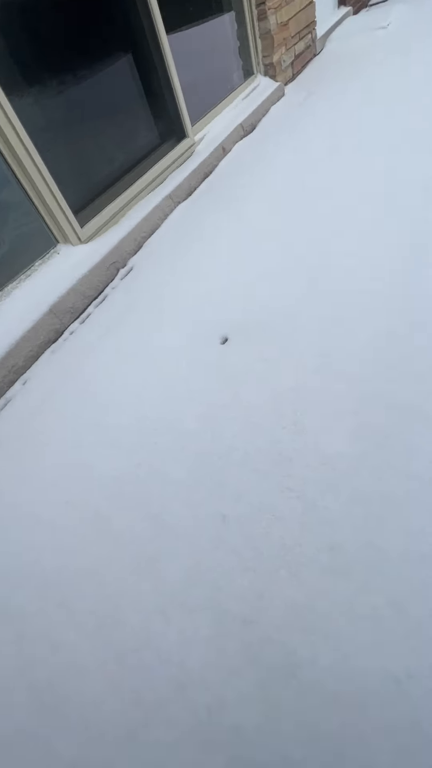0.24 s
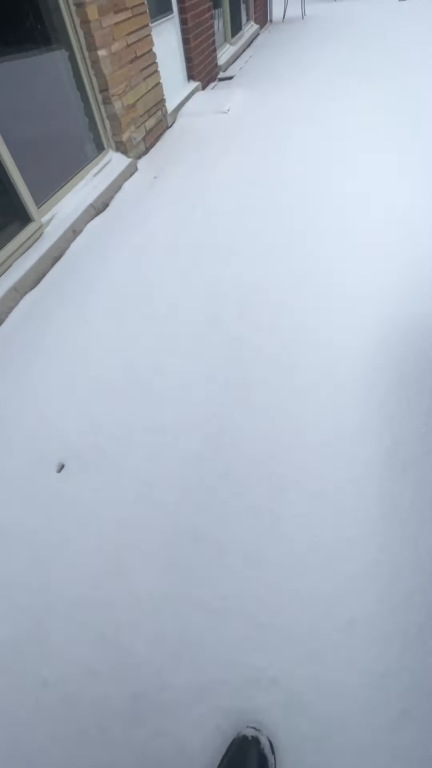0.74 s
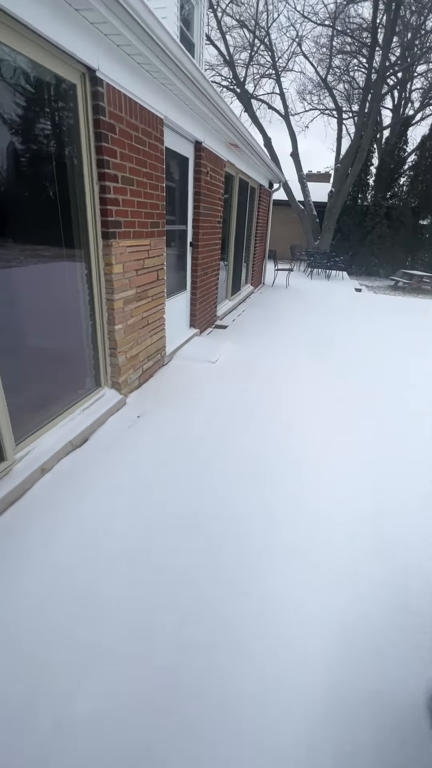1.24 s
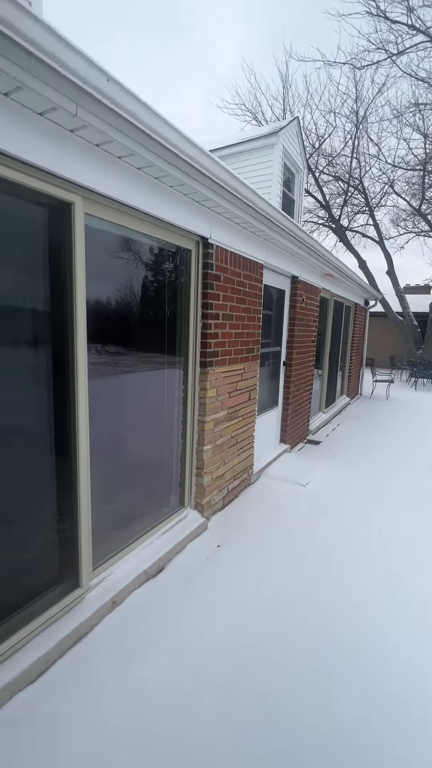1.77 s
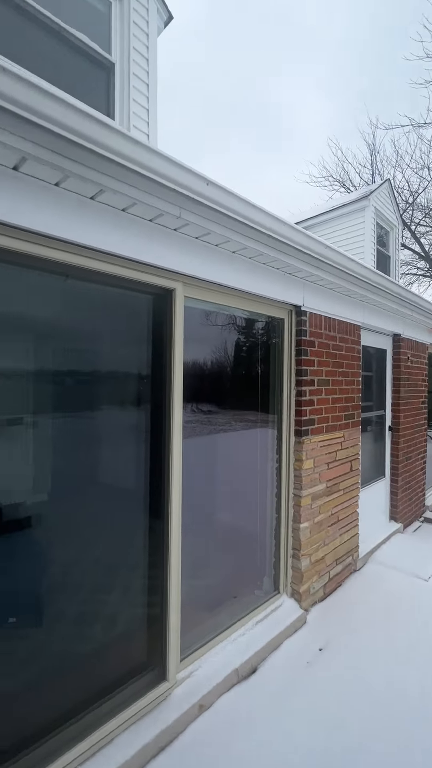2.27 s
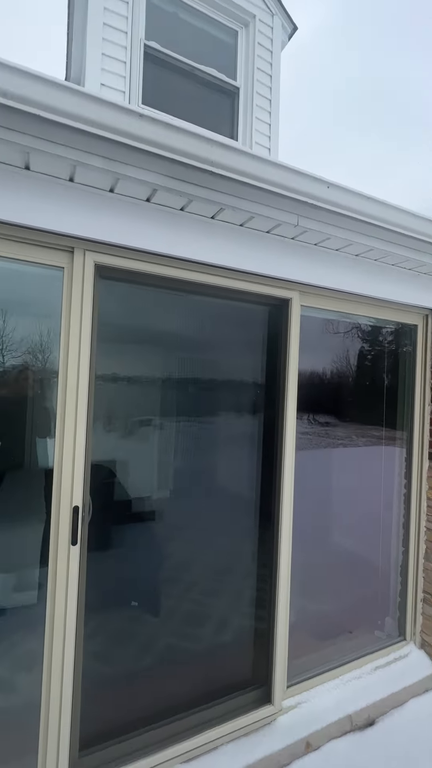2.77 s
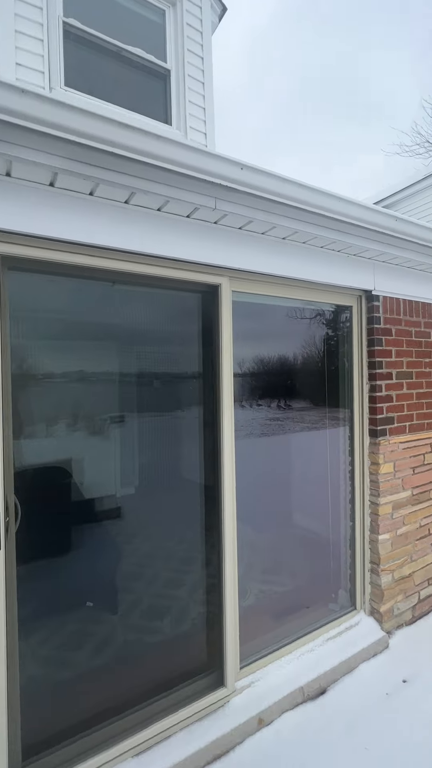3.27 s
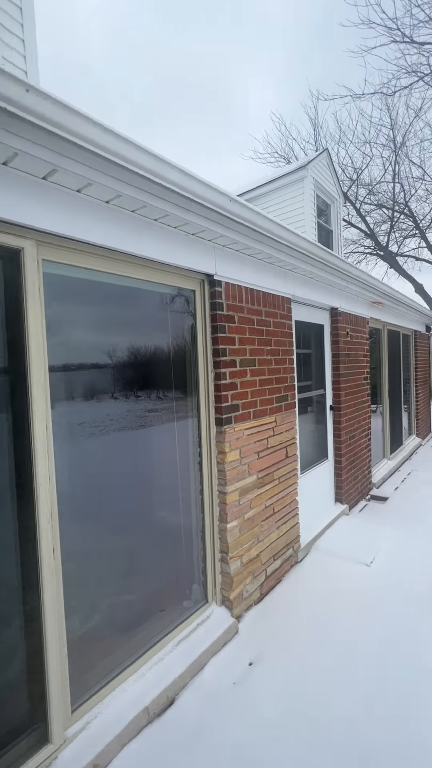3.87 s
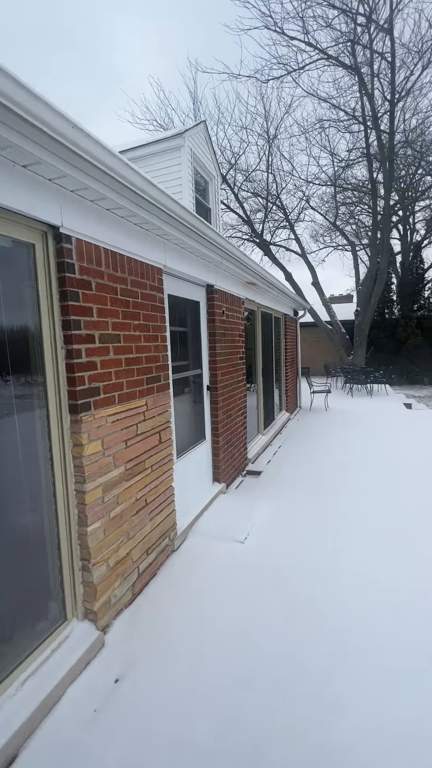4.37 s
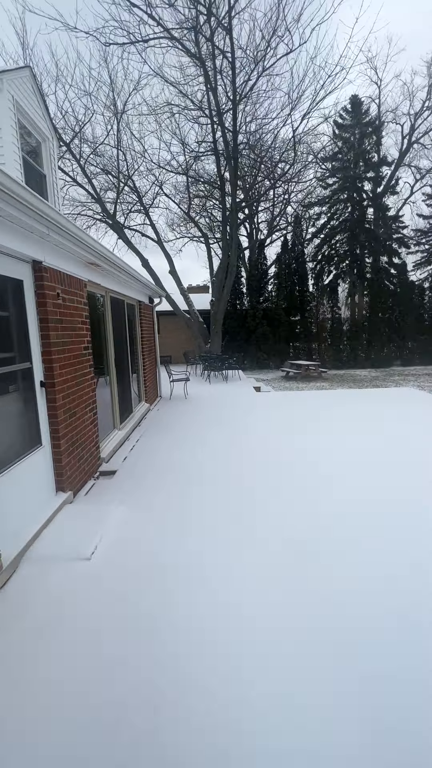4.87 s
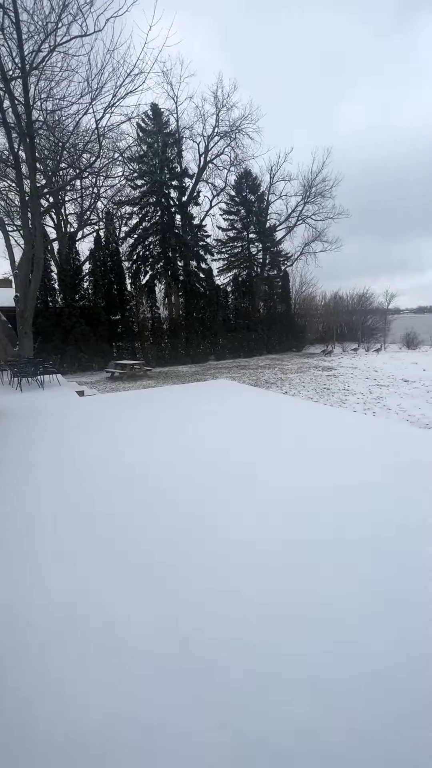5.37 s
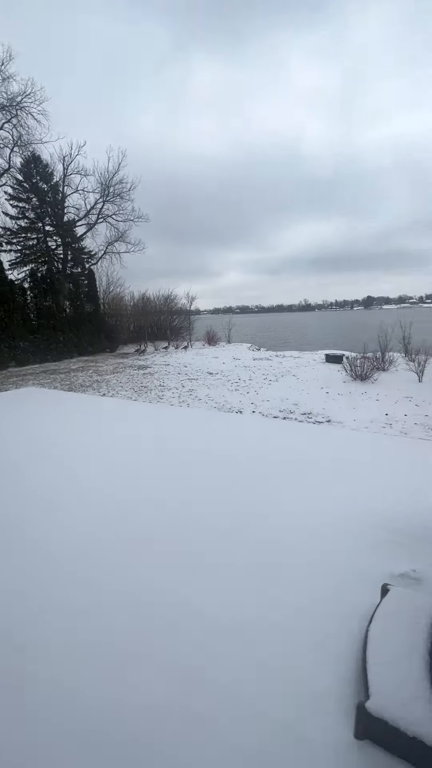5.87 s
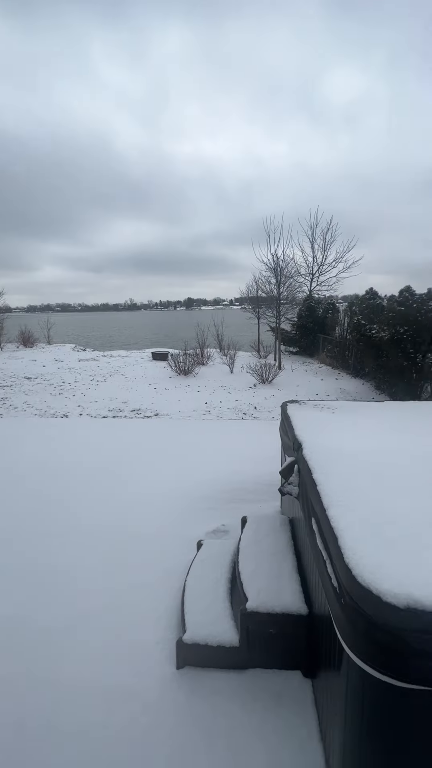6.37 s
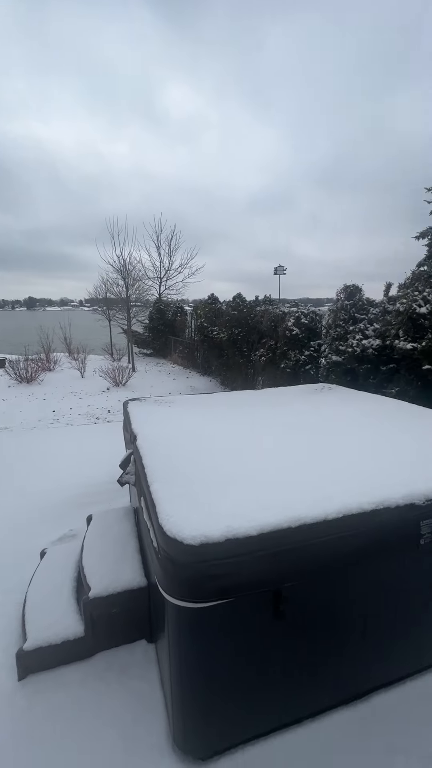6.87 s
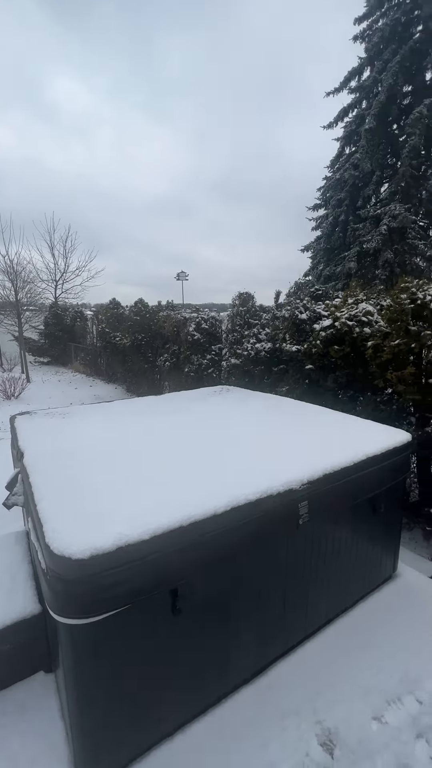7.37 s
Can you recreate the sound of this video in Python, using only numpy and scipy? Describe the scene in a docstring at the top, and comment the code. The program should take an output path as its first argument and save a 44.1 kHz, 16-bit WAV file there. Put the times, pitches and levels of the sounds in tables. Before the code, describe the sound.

Boots crunch through crusty snow on a terrace, close to a hand-held microphone. The first steps are loudest, with sharp crackles, gritty scuffs and dull heel thuds. The uneven steps then grow softer and dwindle to light shuffles near the end. Low wind rumbles on the microphone throughout, with a few puffs early on. Water birds and a small songbird call faintly far off, and a pump hums very quietly nearby.

```python
"""Boots crunch through crusty snow, close to a hand-held phone on a terrace beside a house.
The crust breaks in bursts of tiny cracks, loose crystals rasp under the moving sole, and heels thud
on the slab below. Wind rumbles on the two microphone ports and puffs on them as the phone swings.
A faint high whistle or creak follows one step. Far off, water birds and a small songbird call
faintly; nearby, a pump hums."""
import sys
import numpy as np
from scipy import signal
from scipy.fft import rfft, irfft, next_fast_len
from scipy.io import wavfile
from scipy.ndimage import uniform_filter1d, map_coordinates

SR = 44100
rng = np.random.default_rng(int(sys.argv[2]) if len(sys.argv) > 2 else 0)


def log_audio(samples):
    """Write samples as a 16-bit WAV file to the path given in sys.argv[1]."""
    # one column per channel
    frames = np.atleast_2d(samples).T
    # limit to full scale, then quantise
    limited = np.clip(frames, -1, 1)
    pcm = np.round(limited * 32767).astype(np.int16)
    wavfile.write(sys.argv[1], SR, pcm)


N = 336924

# the pump nearby: f/Hz, level/dB
PUMP_HUM = [(118.5, -59)]
# a faint high whistle or creak just after a step (first row), then distant bird calls:
# t/s, length/s, pitch/Hz, glide from start to end/Hz, level/dB
WHISTLES = [(1.02, .21, 3240, -27, -55.5), (2.993, 0.283, 988, 55, -62.5), (3.306, 0.047, 4250, -800, -56),
            (4.675, 0.037, 1470, -22, -62), (4.95, 0.104, 1232, -46, -67), (5.135, 0.056, 1475, 12.5, -66),
            (5.236, 0.036, 4690, 0, -59), (5.872, 0.0475, 3140, -520, -77.5),
            (5.947, 0.158, 1410, 108.5, -76), (6.116, 0.25, 1245, -5, -64.5),
            (6.143, 0.04, 4310, -700, -66), (6.25, 0.255, 4180, 50, -80), (6.17, 0.34, 540, 92.5, -54),
            (6.507, 0.073, 1435, -52, -75), (6.84, 0.071, 1223, -43.5, -63), (6.925, .045, 3000, 320, -79),
            (7.028, 0.11, 1466, 22, -66.5), (7.062, .04, 4650, -800, -66), (7.21, 0.078, 1073, 0.5, -62),
            (7.271, 0.082, 1230, -38.5, -62), (7.274, 0.2, 1933, -480, -77.5),
            (7.44, 0.045, 5260, 0, -82.5), (7.478, .036, 4250, -2.5, -79), (7.503, .07, 3180, -900, -79),
            (7.542, 0.045, 1450, -48.5, -71)]
# course of the wind: t/s, buffet level/dB, far rush level/dB
WIND_LEVELS = [(0, -51.5, -41), (1.7, -52, -51.5), (4, -52.5, -52), (5.9, -52.5, -53), (6.3, -53.5, -49.5),
               (6.7, -54, -50), (7.64, -52, -53)]
# wind on the microphone: f/Hz, level/dB
BUFFET_SPECTRUM = [(20, -24), (40, -9), (59, 5), (96, -2.5), (146, -11.5), (200, -15.5), (260, -35),
                   (440, -120)]
# wind in the distance: f/Hz, level/dB
RUSH_SPECTRUM = [(88, -19), (150, -7), (387, -16.5), (515, -18.5), (1230, -32.5), (2060, -43.5),
                 (2400, -47), (3010, -45), (14000, -76.5)]
# stereo image of the wind: f/Hz, left-right likeness
WIND_LIKENESS = [(30, 0.76), (125, .93), (300, 0.87), (1000, 0.22), (5000, 0.15)]
# air beats on the ports: t/s, level/dB
PUFFS = [(0.619, -26), (0.816, -22.5), (0.901, -30)]
# phase lead of the left port: f/Hz, phone pointed at the ground/rad, phone raised/rad
PORT_LEAD = [(200, 0, 0), (750, -1.2, 1.08), (1290, -2.04, 2), (1510, -0.1, -0.1), (2100, 0.2, 1),
             (2970, 2, 2.5), (4120, 4, 6.5), (5300, 3.5, 3.5), (7500, 8, 8.5), (8740, 5, 4.5)]
# the phone's body shades the right port: f/Hz, share of the full shade
PORT_SHADOW = [(170, 0.083), (750, 0.92), (1400, 0.072)]
# stereo image of the snow underfoot: f/Hz, left-right likeness
SNOW_LIKENESS = [(200, 0.97), (600, 0.38), (1100, 0.25), (1700, 0.7), (2600, .65), (4000, 0.3),
                 (7000, 0.38)]
# weight lands on the slab: t/s, level/dB, extra boom/dB, decay/s
HEEL_THUDS = [(0.175, -17.5, -8, 0.15), (0.31, -16, -48, 0.027), (0.787, -31.5, -6.5, 0.56),
              (1.331, -38, 11.5, 0.13), (0.945, -21.5, -29, 0.061), (1.974, -27.5, -31.5, 0.15),
              (2.451, -32.5, -1.5, 0.15), (3.778, -21.5, -11.5, 0.18), (3.915, -31, -16, 0.29),
              (4.294, -21.5, -7.5, 0.16), (4.511, -34, -1, 0.35), (4.665, -28, -16, 0.2),
              (5.461, -26.5, -19, 0.2)]
# resonances of the slab: f/Hz, width/Hz, level/dB
SLAB_MODES = [(72.3, 60, 2.5), (146.4, 84, 9.5), (258.8, 110, 4), (411.4, 170, 1.5), (708, 310, -1.5)]
# the sole drags: t/s of most pressure, level/dB, 20 dB rise/s, 20 dB fall/s
SCUFFS = [(.15, -37.5, 0.75, 0.1), (0.611, -38.5, 0.72, 0.058), (.9, -38, 0.18, 0.36),
          (1.339, -33, 0.035, 0.099), (1.522, -45, 0.73, .09), (1.839, -49, 0.04, 0.08),
          (2.0, -46, 0.32, 0.19), (2.457, -33, 0.059, 0.18), (2.53, -41, 0.15, 0.11),
          (3.63, -48.5, 0.081, 0.13), (3.941, -43.5, 0.36, 0.15), (4.05, -47.5, .15, 0.071),
          (5.33, -48, 0.06, 0.056), (6.79, -65, 0.083, 0.41), (7.11, -60.5, .1, 0.305)]
# faint rasp between the scuffs: t/s, level/dB
RASP_FLOOR = [(0, -53), (1.7, -61.5), (2.2, -70.5), (2.8, -58), (3.15, -59), (3.4, -66), (4.2, -62),
              (4.74, -57.5), (4.88, -71), (5.55, -66), (5.75, -82.5), (6.23, -67), (6.7, -76.5),
              (7.64, -97)]
# loose crystals under the sole: f/Hz, level/dB
RASP_SPECTRUM = [(500, -34.5), (900, -4.5), (1400, -9.5), (2200, -2), (4300, -3.5), (5600, -2.5),
                 (7300, -6), (8300, -2.5), (9800, -13), (16000, -27)]
# plates of crust snap: t/s, level/dB, f/Hz
PLATE_SNAPS = [(0.113, -13, 2190), (0.1699, -2, 2140), (0.441, -29.5, 2440), (0.468, -29.5, 533),
               (0.488, -30.5, 955), (0.514, -31.5, 1920), (0.706, -28, 790), (1.3276, -16, 1950),
               (1.517, -27.5, 2150), (2.441, -19.5, 1760), (2.4487, -14, 1760), (3.4892, -27.5, 2070),
               (3.9203, -21.5, 526), (4.5085, -26.5, 266), (4.6665, -25.5, 587), (5.4674, -22.5, 597)]
# single crystals snap: t/s, level/dB
CRYSTAL_TICKS = [(0.245, -48), (0.3725, -46), (.953, -45), (1.226, -46.5), (1.316, -41), (1.411, -36),
                 (1.54, -43.5), (1.951, -48.5), (2.075, -53.5), (2.099, -44.5), (2.726, -50),
                 (3.0789, -43.5), (3.2808, -50), (4.0273, -48.5), (4.223, -47.5), (5.079, -66.5),
                 (5.289, -60.5), (5.311, -57), (5.325, -58), (5.342, -54), (6.52, -69.5), (6.766, -63.5),
                 (7.069, -65.5)]
# the crust gives way: t/s, level/dB, coarse chunks/dB, fine crystals/dB (both relative), decay/s
CRUST_BREAKS = [(0.0355, -25, -8, -1, 0.071), (0.0623, -20.5, -12.5, 2, 0.066),
                (0.1121, -11.5, -9, -7, 0.07), (0.125, -20.5, -12.5, -1, 0.14),
                (0.167, -11.5, -1.5, -11, 0.038), (0.3049, -32, -0.5, 4, 0.037),
                (0.3487, -32.5, -18, -2, 0.026), (0.7815, -21.5, -3, -3.5, 0.11),
                (0.8077, -13, -6, -2, 0.052), (0.8193, -14.5, -4, -5.5, 0.064), (0.87, -32, -4, 0, 0.2),
                (0.907, -23, -7.5, -7.5, 0.033), (0.9997, -25, -16.5, -6, 0.031),
                (1.065, -30.5, -18, -4, 0.036), (1.151, -37, -4.5, 3, 0.035), (1.296, -36.5, 5, -3.5, 0.25),
                (1.324, -17.5, -5.5, -6, 0.07), (1.343, -21.5, 0, -8.5, 0.085),
                (1.36, -23.5, -2.5, -7, 0.1), (1.397, -32, 2.5, -4.5, 0.11),
                (1.601, -34, -13.5, -5.5, 0.06), (1.918, -34, 4, 5.5, 0.069),
                (1.996, -39.5, -1, 2.5, 0.092), (2.4438, -18, -5, -15.5, 0.072),
                (2.479, -27.5, 5, -8, 0.07), (2.509, -25, -8, -4, 0.14), (2.531, -25.5, -5.5, -1.5, 0.087),
                (2.5998, -36, 1.5, 7, 0.061), (2.7656, -28.5, -5, -12.5, 0.071),
                (2.869, -35, -3.5, -5, 0.058), (3.4463, -28, -2, -9, 0.076), (3.488, -30, -4, -9.5, 0.063),
                (3.6124, -40, -4, -2.5, 0.14), (3.6604, -39, -0.5, -1.5, 0.12),
                (3.7173, -30.5, 0.5, 0, 0.12), (3.7987, -39.5, 5.5, 2, 0.058), (3.8376, -40.5, 7, 1, 0.14),
                (3.9252, -40, 9, 3.5, 0.083), (4.293, -37, 3.5, -12, 0.048), (4.361, -39, -6, -4.5, 0.057),
                (4.505, -38.5, 8.5, -14, 0.067), (4.665, -58.5, 30, -20, 0.034),
                (5.464, -53, 11, -34, 0.082), (5.5239, -53, 2, -13.5, 0.19), (6.036, -48.5, -5, 0, 0.057),
                (6.2193, -45, 3.5, -10, 0.06)]
# cracking crust at close range: f/Hz, level/dB
CRUST_SPECTRUM = [(150, -26), (250, -3.5), (662, 2), (802, -4), (1280, -8), (1790, -12), (2160, -8.5),
                  (3520, -15.5), (8120, -10.5), (16000, -25.5)]

TIME = np.arange(N) / SR


def amp(db):
    """Decibels to gain."""
    return 10 ** (np.asarray(db) / 20)


def unit(x):
    """Scaled to rms 1."""
    return x / np.sqrt(np.mean(x ** 2) + 1e-20)


def along(points, hz):
    """Rows of f/Hz and a value, read on a log axis."""
    f, values = np.transpose(points)
    return np.interp(np.log(hz + 1), np.log(f + 1), values)


def curves(rows):
    """One value per sample for each column after t/s."""
    s, *columns = np.transpose(rows)
    return [np.interp(TIME, s, column) for column in columns]


def wobble(rate):
    """A smooth random curve, rate knots a second."""
    return map_coordinates(rng.standard_normal(int(N * rate / SR) + 4), [TIME * rate])


def filtered(x, response):
    """x through a frequency response."""
    size = next_fast_len(N + SR // 2)
    return irfft(rfft(x, size) * response(np.fft.rfftfreq(size, 1 / SR)), size)[..., :N]


def below(hz, edge_hz):
    """A soft step from 1 under the edge to 0 above it."""
    return 1 / np.sqrt(1 + (hz / edge_hz) ** 6)


def stereo(x, spectrum, likeness):
    """Two unrelated noises, coloured and mixed as mid and side to a left-right likeness; rms 1."""
    def response(hz):
        angle = np.arccos(np.clip(along(likeness, hz), -1, 1)) / 2
        return amp(along(spectrum, hz)) * [np.cos(angle), np.sin(angle)]
    mid, side = filtered(x, response)
    return unit(np.array([mid + side, mid - side]))


def pump():
    """Faint mains hum from a pump nearby, not quite steady."""
    waver = amp(2.5 * wobble(6))
    return sum(np.sqrt(2) * amp(db) * waver * np.sin(2 * np.pi * hz * TIME) for hz, db in PUMP_HUM)


def whistles():
    """Far bird calls and one faint creak: gliding, trembling tones that waver in the moving air."""
    out = np.zeros(N + SR)
    tremble, rasp = wobble(150), wobble(700)
    for s, length, hz, glide_hz, db in WHISTLES:
        progress = np.arange(round(length * SR)) / (length * SR)
        span = slice(round(s * SR), round(s * SR) + len(progress))
        arch = np.sin(np.pi * progress)
        water_bird, hoarse, high = hz < 1600, hz < 700, hz > 2500
        twitter = hz > 4000 and length < .06 and abs(glide_hz) < 300
        bow = .064 * water_bird + .3 * twitter  # the pitch bows up in mid-call
        pitch = hz + glide_hz * (progress - .5) + bow * hz * (np.sqrt(arch) - .76)
        pitch *= 1 + (.009 + .09 * hoarse) * tremble[span] + .028 * high * rasp[span]
        out[span] += amp(db) * arch ** .45 * np.sin(2 * np.pi * np.cumsum(pitch) / SR)
    return out[:N] * amp(1.8 * np.array([wobble(45), wobble(45)]))


def echoes(x, t60=.3, echo_db=-1.5):
    """Walls and trees smear distant sound with a short tail, different on each side."""
    t = np.arange(round(t60 * SR)) / SR
    tail = amp(-60 * t / t60) * rng.standard_normal((2, len(t)))
    return x + amp(echo_db) * signal.fftconvolve(x, tail / np.linalg.norm(tail[0]), axes=1)[:, :N]


def wind():
    """Buffeting right on the ports, over the far rush of air in trees and across water."""
    buffet_db, rush_db = curves(WIND_LEVELS)
    buffet = stereo(amp(.4 * wobble(9.8)) * rng.standard_normal((2, N)), BUFFET_SPECTRUM, WIND_LIKENESS)
    rush = stereo(amp(.68 * wobble(.94)) * rng.standard_normal((2, N)), RUSH_SPECTRUM, WIND_LIKENESS)
    lean_left = amp([[.8], [-.8]])
    return amp(buffet_db + 3.5) * buffet + amp(rush_db - 2) * rush * lean_left


def swing_gust(swing_s=.72, half_width_s=.2, stream_db=-38, puff_hz=88.3, puff_s=.0089):
    """Air streams past the swinging phone, pushing one port, pulling the other, and puffs on both."""
    phases = .5 * rng.standard_normal((len(PUFFS), 2, 1))
    puffs = np.zeros((2, N))
    for (s, db), phase in zip(PUFFS, phases):
        t = TIME - s
        puffs += amp(db) * np.exp(-(t / puff_s) ** 2) * np.cos(2 * np.pi * puff_hz * t + phase)
    stream = stereo(rng.standard_normal((2, N)), spectrum=[(25, -12), (75, -2), (130, -5), (400, -69)],
                    likeness=[(60, -.72)])
    swell = np.exp(-((TIME - swing_s) / half_width_s) ** 2)
    return puffs + amp(stream_db) * swell * stream


def ports(x, raise_s=(.84, 2), down_shade_db=5, up_shade_db=6):
    """Close sound meets the two ports out of step; its midrange shifts left as the phone is raised."""
    sides = np.array([[.5], [-.5]])
    grid_hz, down_lead, up_lead = np.transpose(PORT_LEAD)

    def held(lead, shade_db):
        return filtered(x, lambda hz: amp(sides * shade_db * along(PORT_SHADOW, hz))
                        * np.exp(1j * sides * along(np.c_[grid_hz, lead], hz)))
    down, up = held(down_lead, down_shade_db), held(up_lead, up_shade_db)
    return down + np.interp(TIME, raise_s, [0, 1]) * (up - down)


def pings(s, db, hz, cycles):
    """Short tones, one for each time, that swell at once and die after a few cycles."""
    step = np.arange(SR // 50)
    turns = step / SR * np.c_[hz]
    age = turns / cycles
    tones = np.c_[amp(db)] * np.e * age * np.exp(-age ** .95) * np.sin(2 * np.pi * turns)
    samples = np.c_[np.round(s * SR).astype(int)] + step
    return np.bincount(samples.ravel(), tones.ravel(), N + SR)[:N]


def cracks(spread_db, clump_db, clump_rate, ring_db):
    """Dense tiny fractures in clumps, most weak, a few large; each lump favours its own pitches."""
    size = amp(spread_db * np.minimum(rng.exponential(size=N), 5.8) + clump_db * wobble(clump_rate))
    spectra = signal.stft(size * rng.standard_normal((2, N)), nperseg=256)[2]
    lumps = uniform_filter1d(rng.standard_normal(spectra.shape[1:]), size=2, axis=0)
    lumps = uniform_filter1d(lumps, size=5, axis=1)
    return signal.istft(spectra * amp(ring_db * unit(lumps)), nperseg=256)[1][:, :N]


def heels():
    """Heels shake the slab; lower modes sound later and longer, and packing snow makes them waver."""
    t = np.arange(SR // 3) / SR
    out = np.zeros(N)
    for hz, width_hz, mode_db in SLAB_MODES:
        slowness = (300 / hz) ** .73
        waver = amp(1.6 * wobble(width_hz))
        pitch = hz + .4 * width_hz * wobble(width_hz)
        attack = 1 - np.exp(-t / (.0042 * slowness ** .85))
        envelope = np.zeros(N + SR)
        for s, db, boom_db, decay_s in HEEL_THUDS:
            level_db = db - 7 + mode_db + boom_db * below(hz, 170) ** 2
            fade_db = -60 * t / (slowness * np.clip(decay_s, .02, .5))
            envelope[round(s * SR):][:len(t)] += amp(level_db + fade_db) * attack
        out += envelope[:N] * waver * np.sin(2 * np.pi * np.cumsum(pitch) / SR)
    return out


def sole():
    """Loose crystals rasp under the boot and small lumps tick, louder as the pressure rises."""
    power = amp(curves(RASP_FLOOR)[0]) ** 2
    for s, db, rise_s, fall_s in SCUFFS:
        fade_db = -20 * np.where(TIME < s, (s - TIME) / rise_s, (TIME - s) / fall_s)
        power += amp(db + fade_db) ** 2
    envelope = np.sqrt(power)
    loose = cracks(spread_db=3.6, clump_db=1.6, clump_rate=150, ring_db=2)
    rasp = envelope * stereo(loose, RASP_SPECTRUM, SNOW_LIKENESS)
    when, pitch, weakness = rng.random((3, 1600))
    tick_db = 20 * np.log10(envelope[(when * N).astype(int)]) - 3 - 4.5 * np.log(weakness + .015)
    return rasp + pings(when * N / SR, tick_db, hz=500 * 14 ** pitch, cycles=.61)


def plates():
    """Plates of crust break cleanly, each with a short ping."""
    return pings(*np.transpose(PLATE_SNAPS), cycles=.8)


def crust(first_crack_t60=.012):
    """Close to the microphone the crust breaks in bursts of cracks: chunks low, crystals high."""
    dense = cracks(spread_db=3.6, clump_db=2.8, clump_rate=260, ring_db=3)
    grains = stereo(dense, CRUST_SPECTRUM, SNOW_LIKENESS)
    bands = [lambda hz: below(hz, 1350),
             lambda hz: below(hz, 4400) - below(hz, 1350),
             lambda hz: 1 - below(hz, 3000)]
    ticks = [(s, db, -8, 7, .028) for s, db in CRYSTAL_TICKS]  # brief, bright breaks
    t = np.arange(SR // 4) / SR
    power = np.zeros((3, N + SR))
    for s, db, coarse_db, fine_db, decay_s in CRUST_BREAKS + ticks:
        age = t / np.clip(decay_s, .005, .3)
        attack = 1 - np.exp(-age / .031)  # long breaks also start slowly
        fade_db = -60 * (age / [[1.3], [1], [.9]]) ** 1.567  # chunks settle last
        # the shorter the break, the more its first crack stands out
        first_crack = 1 + amp(7 - 60 * t / first_crack_t60) * .025 / np.clip(decay_s, .03, .3)
        burst = first_crack * attack * amp(db - 5.5 + fade_db + [[coarse_db], [0], [fine_db]])
        power[:, round(s * SR):round(s * SR) + len(t)] += burst ** 2
    return sum(np.sqrt(p[:N]) * unit(filtered(grains, band)) for p, band in zip(power, bands))


def scene():
    """At the phone: boots close below, wind on the ports, birds far off, the pump nearby."""
    boots = crust() + plates() + sole() + heels()
    return ports(boots) + wind() + swing_gust() + echoes(whistles()) + pump()


def record(dry, ceiling=.85, top_hz=15900):
    """A soft limiter rounds off the loudest cracks; nothing is kept above the band limit."""
    rounded = dry / (1 + np.abs(dry / ceiling) ** 4) ** .25
    return filtered(rounded, lambda hz: hz < top_hz)


dry = scene()
out = record(dry)
log_audio(out)
```